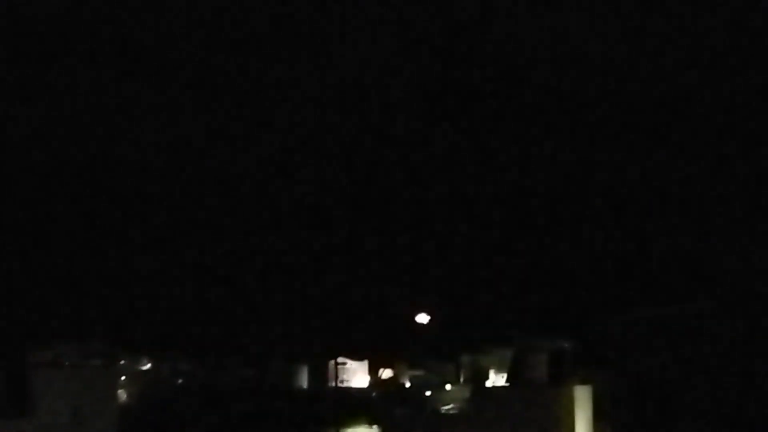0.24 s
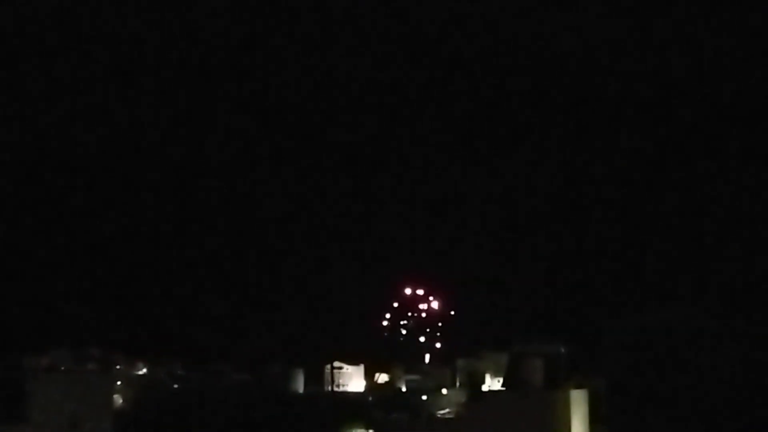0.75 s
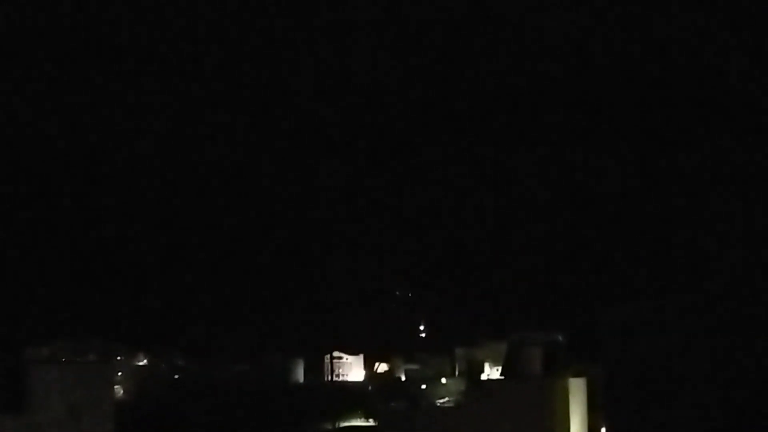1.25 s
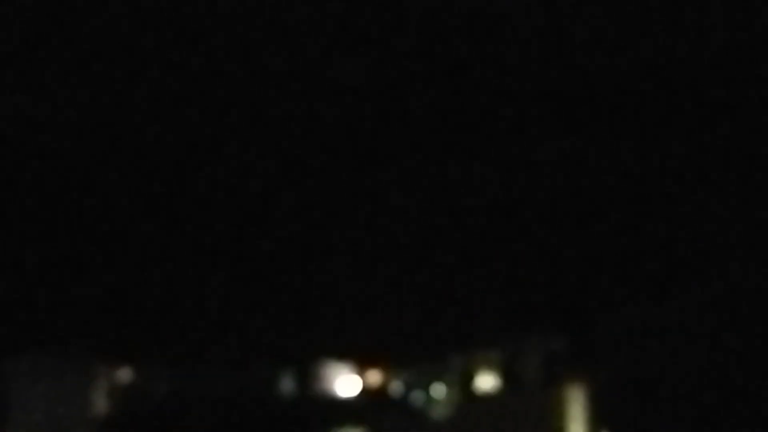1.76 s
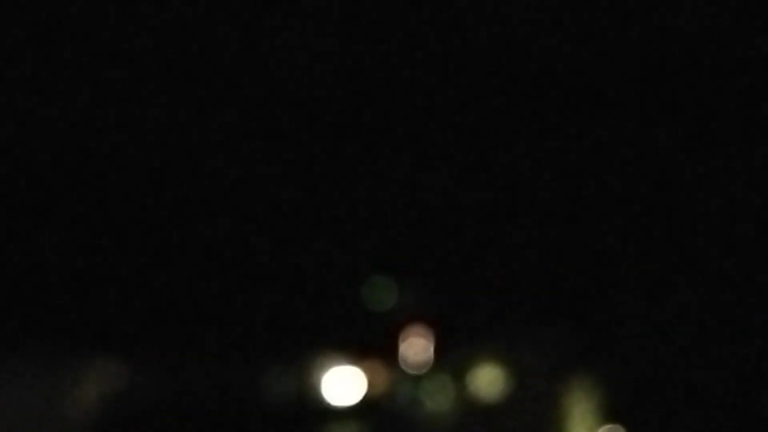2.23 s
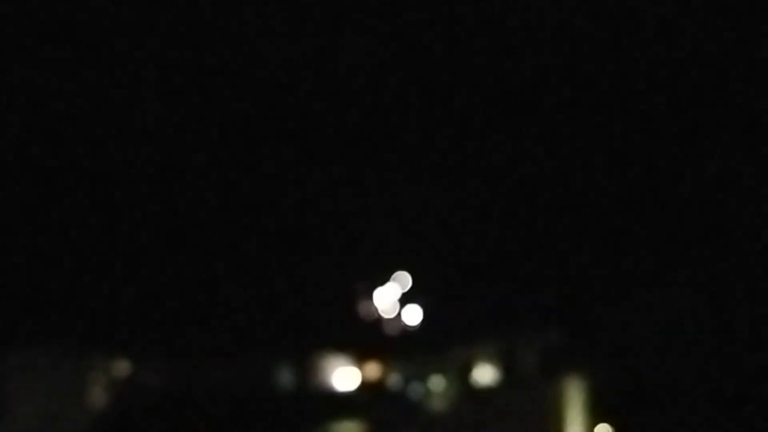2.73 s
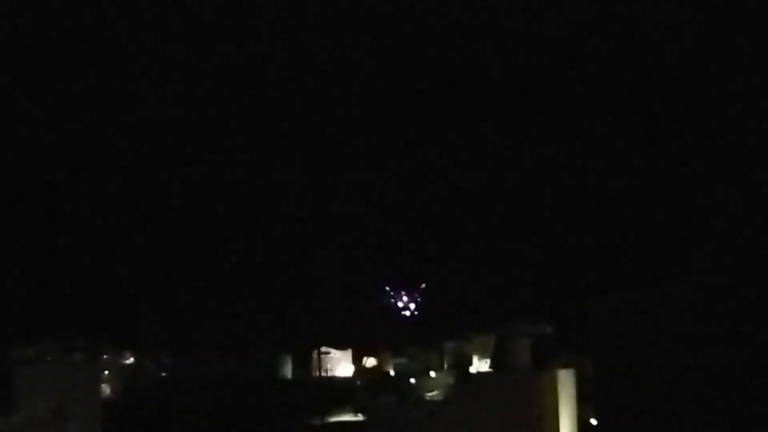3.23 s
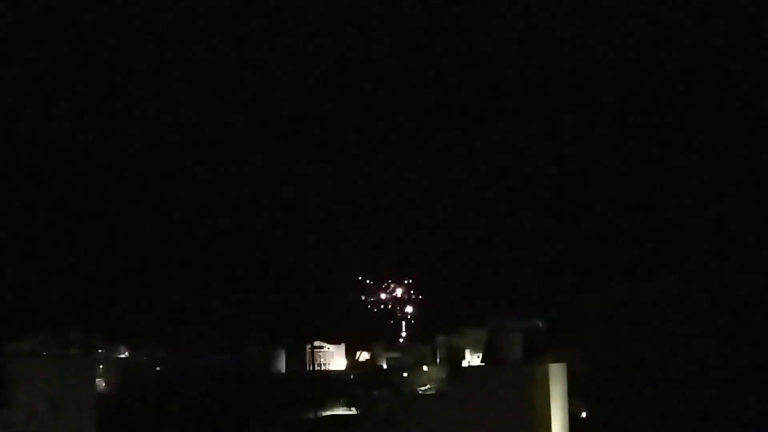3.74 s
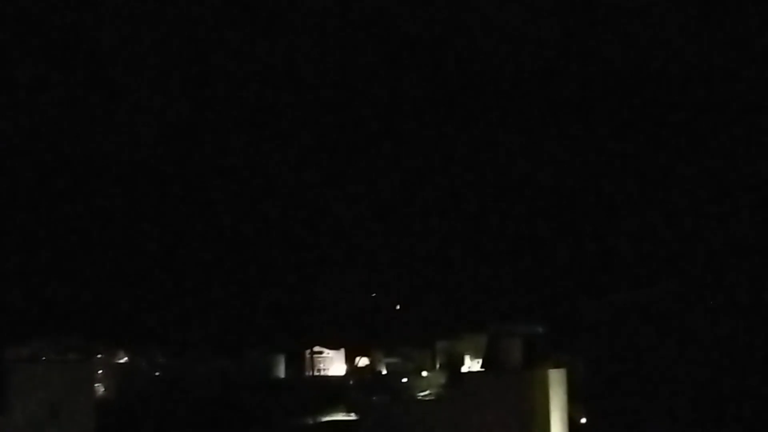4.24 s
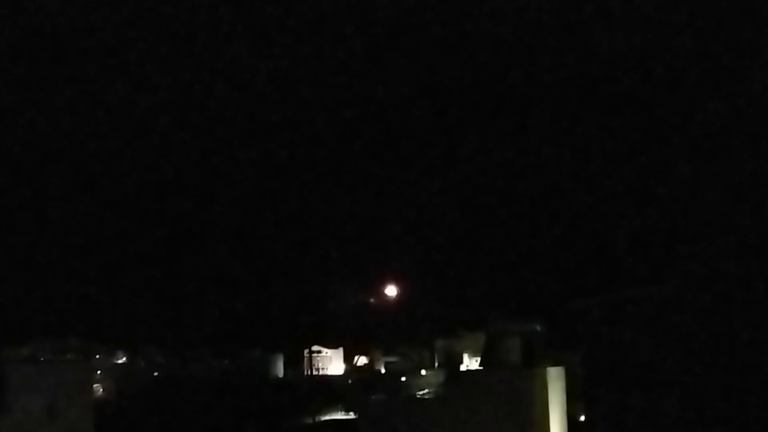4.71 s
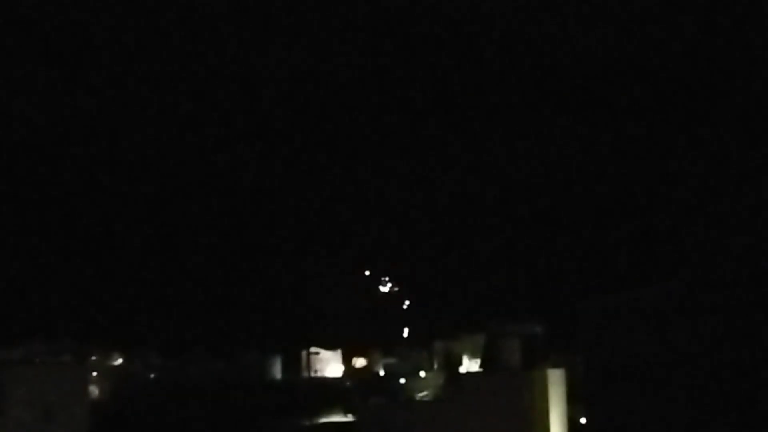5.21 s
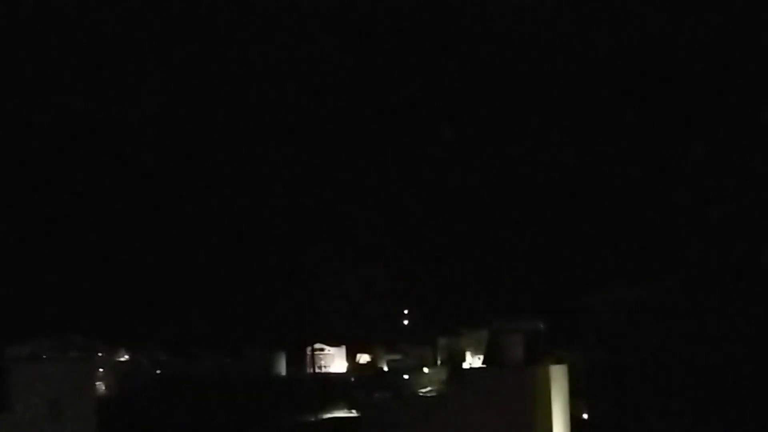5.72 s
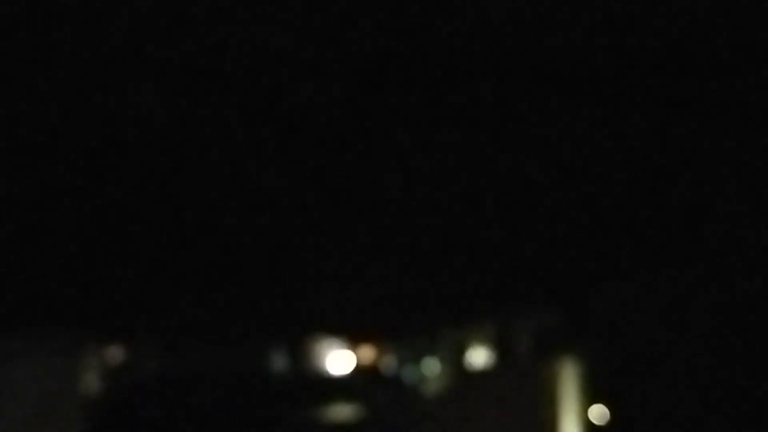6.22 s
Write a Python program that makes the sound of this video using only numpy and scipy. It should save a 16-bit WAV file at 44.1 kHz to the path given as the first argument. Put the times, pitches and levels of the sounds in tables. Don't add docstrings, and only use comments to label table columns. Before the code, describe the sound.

Quiet night outdoors, distant fireworks. Faint crackle from an earlier shell comes first, then a double-edged bang, a sharper loud bang, a softer deeper one and a final very loud short crack. After each of the first three, rough low echoes roll off houses and small stars pop in a thickening, thinning swarm. A small stereo microphone stands near house walls, giving every report a tight hard slap.

```python
import sys
import numpy as np
from scipy import signal
from scipy.fft import rfft, irfft, next_fast_len
from scipy.io import wavfile
from scipy.ndimage import uniform_filter1d

SR = 44100
rng = np.random.default_rng(int(sys.argv[2]) if len(sys.argv) > 2 else 0)


def elevation(decibels):
    levels = np.asarray(decibels, float)
    return 10 ** (levels / 20)


def wrap_up_sound(samples):
    columns = np.atleast_2d(samples).T
    tamed = np.clip(columns, -1, 1)
    steps = np.round(tamed * 32767).astype(np.int16)
    wavfile.write(sys.argv[1], SR, steps)


N = 284886

# [Hz, dB per Hz]
NIGHT_SPECTRUM = [(13, -60), (22, -23), (80, -2.5), (193, 2), (876, -13.5), (977, -8), (1480, -11.5),
                  (1940, -13), (4560, -16.5), (6510, -23), (7270, -32), (9840, -29), (11000, -30),
                  (11900, -25.5), (15700, -26.5)]
# [Hz, 0-1]
LEFT_RIGHT_LIKENESS = [(30, 0.64), (70, 0.52), (130, 0.56), (300, 0.8), (700, 0.09), (1600, 0.067),
                       (4000, 0.13), (12000, 0.056)]
# [s, dB]
TOWN_ANSWER = [(.03, -29), (.07, -37.5), (.13, -34.5), (.2, -39), (.33, -40), (.45, -45.5), (.7, -56),
               (1.2, -58), (2.5, -60.5)]
SHELL_ROLL_DB = [-2, -0.5, -0.5, 2]
# [Hz, dB per Hz]
ROLL_SPECTRUM = [(24, -75), (40, -27), (150, -10), (199, -8.5), (242, -3.5), (413, -1.5), (452, -1.5),
                 (565, -3.5), (686, -0.5), (896, -12.5), (1400, -16.5), (1820, -24), (3080, -120)]
SHELL_ROAR_DB = [-18, -14.5, -14, -12]
# [Hz, dB per Hz]
ROOF_SPECTRUM = [(400, -35), (900, 0), (1600, 2), (3000, -1.5), (5000, -8.5), (7500, -28), (10000, -30),
                 (14000, -66)]
# [ms, ms, dB, dB, Hz]
NEAR_WALLS = [
    (.75, .78, -12, -14, 6000),
    (5.14, 5.11, -3.2, -5.5, 8000),
    (12.1, 12.1, -5, -5, 650),
    (25.0, 24.8, -11, -11, 600),
]
# [Hz, Hz, dB]
ALCOVE_MODES = [(191, 13, -3.5), (260.4, 48, 0.5), (428, 21, -19), (584, 29, 1)]
# [s, dB,
# Hz]
HOUSE_SLAPS = [(.15, -43.5, 405), (1.608, -45, 241), (1.788, -47, 375), (1.828, -34, 255),
               (1.984, -55, 270), (3.392, -55, 344), (3.583, -31, 630), (4.507, -19, 527),
               (6.262, -21, 613), (6.284, -24, 377), (6.319, -23, 516)]
# [s, dB, Hz]
GLASS_RETURNS = [
    (4.4894, -53, 3110),
    (6.322, -24.5, 3500),
    (6.3397, -38, 3310),
]
# [s, dB, s, s]
STAR_SWARMS = [
    (.56, -64, 0.044, 0.05),
    (.7, -61, 0.072, 0.18),
    (2.431, -41.5, 0.2, 0.18),
    (2.618, -50, 0.12, 0.24),
    (4.022, -34, 0.18, 0.16),
    (4.18, -47.5, 0.035, 0.19),
    (5.1, -40.5, 0.18, 0.091),
    (5.2, -42.5, 0.025, 0.18),
    (5.59, -50, 0.024, .08),
]
# [Hz, dB per Hz]
SWARM_SPECTRUM = [(180, -32), (300, -12), (574, -1), (888, -8.5), (987, -4), (1060, -6.5), (1350, -4.5),
                  (3200, -2.5), (5260, -9.5), (11000, -32), (14300, -109), (22000, -120)]
# [s, dB, dB]
SINGLE_STARS = [(0.15, -49, -6), (0.17, -41.5, -9), (0.2593, -38.5, -4.5), (0.427, -48.5, -18),
                (0.4626, -44, -17), (0.488, -43.5, -16.5), (0.5612, -45.5, -15),
                (0.5894, -54.5, -13.5), (0.6469, -48.5, -5), (0.6649, -37, -18.5),
                (0.7098, -42.5, -10.5), (0.7772, -49, -4.5), (0.831, -46.5, -8.5),
                (0.851, -44.5, -6.5), (0.9632, -40.5, -10), (0.9913, -41.5, -10),
                (1.0147, -41.5, -9.5), (1.1574, -43, -14.5), (1.1871, -42, -9.5),
                (1.287, -36.5, -10.5), (1.4252, -52, -10),
                (2.2165, -36, -16.5), (2.2814, -34, -12), (2.3123, -36.5, -7.5),
                        (2.3497, -38, -5.5), (2.4168, -33, -8.5), (2.4465, -28, -4.5), (2.4559, -35, -10),
                        (2.4973, -29, -18), (2.5531, -30.5, -10), (2.587, -31.5, -15), (2.596, -33.5, -7.5),
                        (2.6367, -26, -12.5), (2.6532, -27, -20), (2.7878, -31, -6.5),
                        (2.9146, -33.5, -11.5), (3.0968, -39.5, -15.5),
                (3.7573, -32.5, -18.5), (3.7752, -34, -14), (3.8075, -30.5, -22),
                         (3.827, -36, -8.5), (3.8645, -25.5, -18.5), (3.8853, -29, -10),
                         (3.903, -28.5, -3.5), (3.9247, -21.5, -16.5), (3.9414, -24, -10.5),
                         (3.9759, -26, -13.5), (4.0081, -23, -12), (4.0194, -20.5, -22.5),
                         (4.0419, -26, -6.5), (4.0724, -21, -18.5), (4.0997, -21.5, -16.5),
                         (4.1112, -22.5, -11), (4.1392, -25, -13.5), (4.166, -23.5, -12),
                         (4.1768, -25, -11), (4.2215, -27.5, -8), (4.2673, -27.5, -8.5),
                         (4.3184, -31.5, -9),
                (4.87, -36.5, -16), (4.9037, -41, -11), (4.9152, -38.5, -9), (4.9336, -41.5, -15),
                        (4.9444, -33.5, -12.5), (4.9705, -32.5, -12), (5.011, -34, -5),
                        (5.034, -27.5, -12.5), (5.1, -26, -8), (5.1662, -23.5, -7.5), (5.1717, -16.5, -17),
                        (5.213, -19, -17.5), (5.241, -30.5, -7), (5.2535, -26.5, -8.5),
                        (5.2728, -27.5, -8.5), (5.3177, -54, -16), (5.4163, -31.5, -9.5),
                        (5.477, -39, -20.5), (5.5373, -38, -20.5), (5.5665, -43, -6), (5.5737, -31.5, -20),
                        (5.601, -63, -7), (5.6379, -38.5, -12.5), (5.73, -33.5, -5.5), (5.838, -42.5, -11),
                        (5.8591, -39, -22.5), (5.9263, -55, -6), (5.9557, -45.5, -3), (6.0607, -38.5, -11)]
# [s, dB, Hz]
RINGING_CASINGS = [
    (3.26932, -7.5, 1750),
    (4.3853, -14, 2600),
]
# [s, dB, ms, ms, dB, dB]
SHELL_BURSTS = [
    (1.6756, -10.5, .22, 1.0, 2, -6),
    (3.2689, -4.5, .15, 1.5, -2, -24),
    (4.3841, -12.5, .2, 2.1, 7.5, -24),
    (6.1577, -4.4, .19, 1.1, -4.5, -22),
]

MIDDLING_FULLNESS_DB = -11.5


def rms_one(x):
    return x / np.sqrt(np.mean(x ** 2) + 1e-20)


def at_hz(points, hz):
    point_hz, value = np.transpose(points)
    return np.interp(np.log(hz), np.log(point_hz), value)


def low_pass(x, hz, order=2):
    return signal.sosfilt(signal.butter(order, hz, fs=SR, output="sos"), x)


def add(track, start_s, pulse):
    i = round(start_s * SR)
    track[i:i + len(pulse)] += pulse[:N - i]


def spectrum_axis():
    size = next_fast_len(N)
    return size, np.maximum(np.arange(size // 2 + 1) * SR / size, 1)


def coloured(x, spectrum):
    size, hz = spectrum_axis()
    return rms_one(irfft(rfft(x, size) * elevation(at_hz(spectrum, hz)), size)[..., :N])


def diffuse(source, spectrum):
    size, hz = spectrum_axis()
    alike = np.clip(at_hz(LEFT_RIGHT_LIKENESS, hz), 0, 1)
    mid, side = rfft(source, size)
    pair = np.sqrt(1 + alike) * mid + np.sqrt(1 - alike) * side * [[1], [-1]]
    return coloured(irfft(pair, size)[:, :N], spectrum)


def clicks(per_s, spread_db, channels=1):
    size_db = spread_db * np.minimum(rng.exponential(1, (channels, N)), 4)
    sizes = elevation(size_db) * rng.choice([-1, 1], (channels, N))
    return rms_one(sizes * (rng.random((channels, N)) < per_s / SR))


def unevenness(per_s, spread_db):
    return elevation(spread_db * np.interp(np.arange(N) / SR * per_s, np.arange(300), rng.standard_normal(300)))


def wavelet(hz, turns, rise=1.0):
    phase = 2 * np.pi * hz * np.arange(round(6 * SR / hz)) / SR
    return np.sin(phase) * np.exp(-phase / (np.pi * turns)) * (1 - np.exp(-phase * rise))


def night_air():
    return elevation(-65) * diffuse(rng.standard_normal((2, N)), NIGHT_SPECTRUM)


def all_stars():
    return np.array(SINGLE_STARS)


def roll_level():
    earlier_shells_db, star_roll_db, star_roll_s = -69, -29.5, 0.023
    t = np.arange(N) / SR
    power = np.full(N, elevation(2 * earlier_shells_db))
    for shell, shell_db in zip(SHELL_BURSTS, SHELL_ROLL_DB):
        answer_db = np.interp(t - shell[0], *np.transpose(TOWN_ANSWER), left=-120)
        power += elevation(2 * (shell_db + answer_db))
    for start_s, peak_db, fullness_db in all_stars():
        level_db = peak_db + star_roll_db + fullness_db - MIDDLING_FULLNESS_DB
        add(power, start_s, elevation(2 * level_db) * np.exp(-t[:SR // 2] / star_roll_s))
    return np.sqrt(uniform_filter1d(power, size=300))


def roll():
    level = roll_level() * unevenness(per_s=35, spread_db=2.5)
    echoes = clicks(900, spread_db=1.5, channels=3)
    ahead = elevation(-8.5) * level * coloured(echoes[0], ROLL_SPECTRUM)
    around = elevation(-2.5) * level * diffuse(echoes[1:], ROLL_SPECTRUM)
    return ahead, around


def roar():
    earlier_db, shell_scatter_db = -54, 21
    out = np.zeros(N)
    starts = [0, *[round(shell[0] * SR) for shell in SHELL_BURSTS]]
    out[starts] = elevation(np.array([earlier_db, *SHELL_ROAR_DB]) + shell_scatter_db)
    return out


def roof_scatter(x):
    t60_s, rise_s = 3, 0.0043
    age = np.arange(N) / SR
    fade = elevation(-60 * age / t60_s) * (1 - np.exp(-age / rise_s))
    fade *= unevenness(per_s=40, spread_db=1.5)
    roofs = diffuse(clicks(3000, spread_db=0.0, channels=2), ROOF_SPECTRUM) * fade
    roofs /= np.sqrt(np.mean(np.sum(roofs ** 2, 1)))
    return elevation(-11.5) * signal.fftconvolve(x[None], roofs, axes=1)[:, :N]


def alcove(x):
    out = 0
    for hz, width_hz, gain_db in ALCOVE_MODES:
        r = np.exp(-np.pi * width_hz / SR)
        poles = [1, -2 * r * np.cos(2 * np.pi * hz / SR), r * r]
        out = out + elevation(gain_db) * signal.lfilter([(1 - r * r) / 2, 0, (r * r - 1) / 2], poles, x)
    return out


def yard_smear(x):
    t60_s, top_hz = 0.12, 4470
    age = np.arange(SR // 4) / SR
    shared, own = rng.standard_normal(len(age)), rng.standard_normal((2, len(age)))
    bright_own = signal.lfilter([1, -1], [1, -.9], own)
    smear = low_pass(1.3 * shared + bright_own, top_hz) * elevation(-60 * age / t60_s)
    smear = rms_one(smear) / np.sqrt(len(age))
    return elevation(-8.5) * signal.fftconvolve(x[None], smear, axes=1)[:, :N]


def near_walls(x):
    shaded = signal.lfilter(*signal.butter(1, 6500, fs=SR), x)
    out = np.array([elevation(2.5) * x, elevation(0.06) * shaded])
    for left_ms, right_ms, left_db, right_db, top_hz in NEAR_WALLS:
        dull = low_pass(x, top_hz)
        for ear, (ms, gain_db) in enumerate([(left_ms, left_db), (right_ms, right_db)]):
            lag = round(ms * SR / 1000)
            out[ear, lag:] += elevation(gain_db) * dull[:-lag]
    return out + alcove(out) + yard_smear(x)


def far_air(x):
    dull = low_pass(x, 6060, order=4)
    return signal.sosfiltfilt(signal.butter(2, 160, "high", fs=SR, output="sos"), dull + 1e-18)


def slaps():
    out = np.zeros(N)
    for start_s, peak_db, hz in [*HOUSE_SLAPS, *GLASS_RETURNS]:
        add(out, start_s, elevation(peak_db + 2.5) * wavelet(hz, turns=1.45))
    return out


def crackle():
    edge_db = 17
    t, level = np.arange(N) / SR, np.zeros(N)
    for densest_s, level_db, swell_s, thinning_s in STAR_SWARMS:
        distance = (t - densest_s) / np.where(t < densest_s, swell_s, thinning_s)
        level += elevation(level_db - edge_db * distance ** 2)
    return elevation(-4.0) * level * coloured(clicks(650, spread_db=4.0)[0], SWARM_SPECTRUM)


def stars():
    snap_hz, snap_lag_s, body_db = 2295, 0.00074, -9
    out, rows = np.zeros(N), all_stars()
    for (start_s, peak_db, fullness_db), (lag, share) in zip(rows, rng.random((len(rows), 2))):
        more_db = fullness_db - MIDDLING_FULLNESS_DB
        s = start_s + snap_lag_s
        hz = snap_hz * 2 ** -np.clip(more_db / 16, -1, .7)
        add(out, s, elevation(peak_db + 11) * wavelet(hz, turns=1.5, rise=.25))
        twin = 0.94 * share * elevation(peak_db + 10.5) * wavelet(1.71 * hz, turns=1.3)
        add(out, s + .0004 + 0.00096 * lag, twin)
        add(out, s + 0.00019, -elevation(peak_db + body_db + 10 + more_db) * wavelet(1080, turns=0.54))
    return out


def casings():
    out = np.zeros(N)
    for start_s, peak_db, hz in RINGING_CASINGS:
        add(out, start_s, elevation(peak_db) * wavelet(hz, turns=2.6))
    return out


def blast(front_ms, suction_ms, suction_db):
    ms = np.arange(400) / SR * 1000
    front = np.sin(np.pi * np.clip(ms / (2 * front_ms), 0, 1)) ** 2
    after = np.clip((ms - 1.6 * front_ms) / suction_ms, 0, 1)
    return front - elevation(suction_db) * np.sin(np.pi * after ** .8)


def torn_casing():
    ms = np.arange(900) / SR * 1000
    noise = np.diff(rng.standard_normal(len(ms) + 1))
    return elevation(-19.5) * low_pass(noise, 3240) * elevation(9.5) * np.exp(-ms / 3.85)


def shells():
    out = np.zeros(N)
    for start_s, peak_db, front_ms, suction_ms, suction_db, second_db in SHELL_BURSTS:
        pulse = elevation(peak_db) * blast(front_ms, suction_ms, suction_db)
        add(out, start_s, pulse)
        add(out, start_s + 0.00314, elevation(second_db) * pulse)
        add(out, start_s, torn_casing())
    return out


def scene():
    night = night_air()
    bangs = far_air(shells() + casings() + slaps())
    sparks = far_air(stars() + crackle())
    ahead, around = roll()
    roofs = roof_scatter(roar() + elevation(-4) * sparks) * elevation([[1.4], [-1.4]])
    return near_walls(bangs + sparks + ahead) + around + roofs + night


def roll_off(x):
    return signal.sosfilt(signal.butter(12, 15730, fs=SR, output="sos"), x)


def record(dry):
    bent = dry + .05 * dry ** 2
    thin = signal.sosfilt(signal.butter(2, 40, "high", fs=SR, output="sos"), bent)
    mix = signal.sosfilt(signal.ellip(10, .5, 60, 15650, fs=SR, output="sos"), thin)
    return roll_off(mix)


dry = scene()
out = record(dry)
wrap_up_sound(out)
```